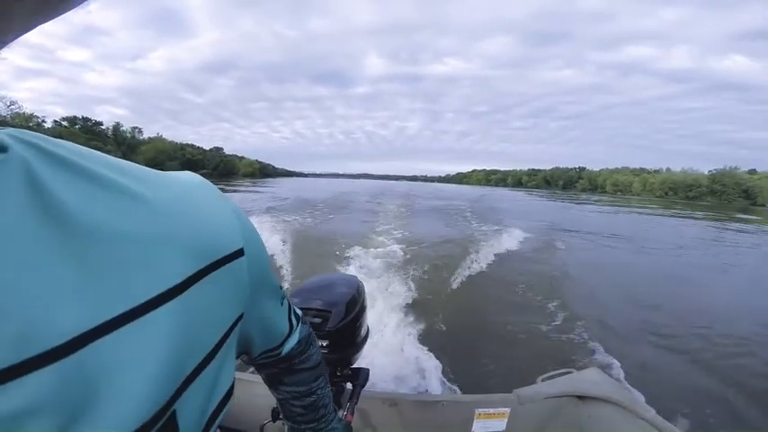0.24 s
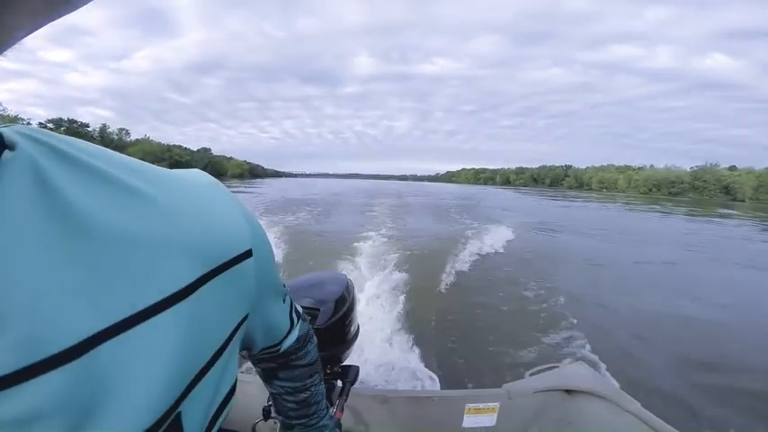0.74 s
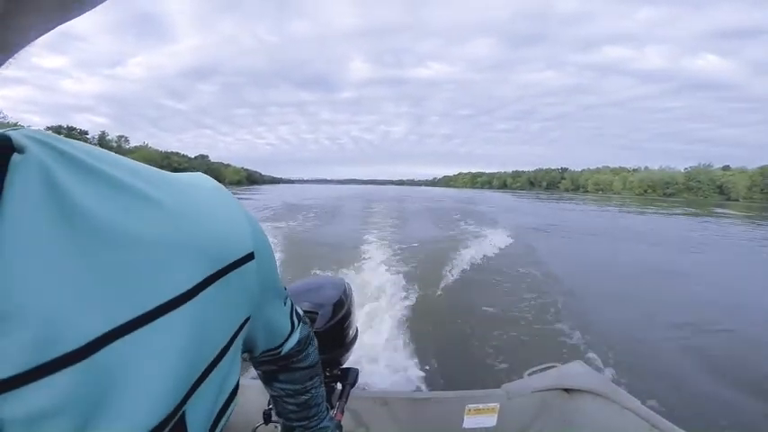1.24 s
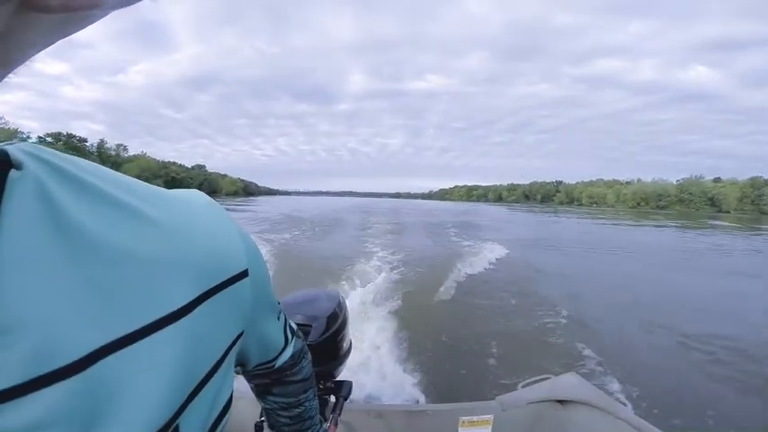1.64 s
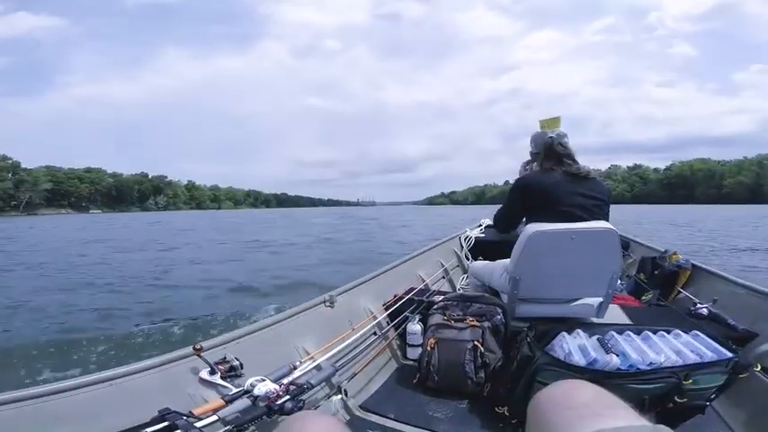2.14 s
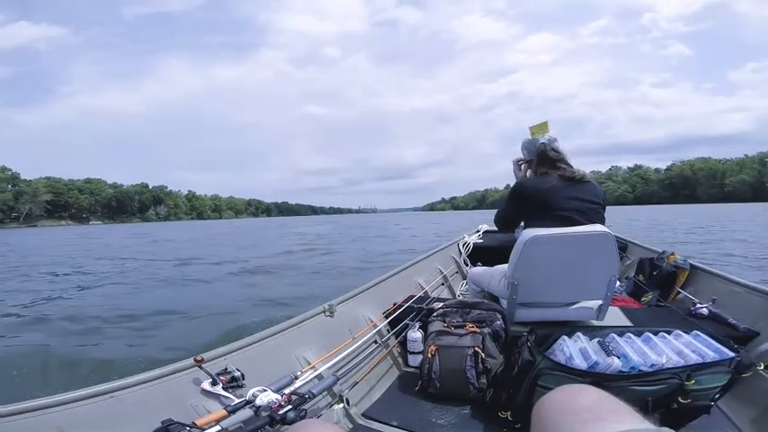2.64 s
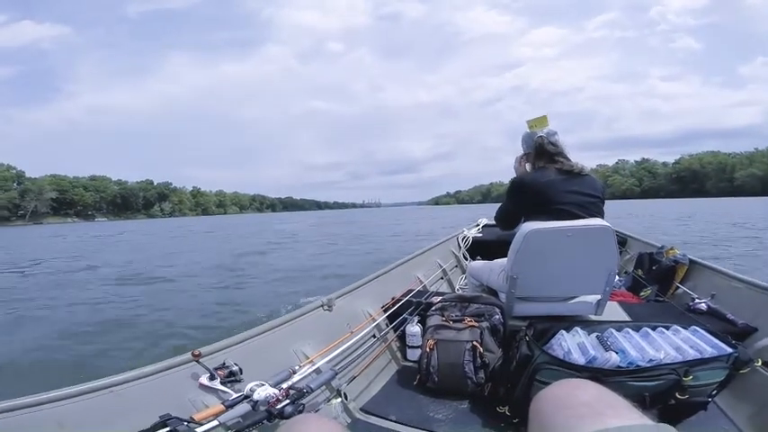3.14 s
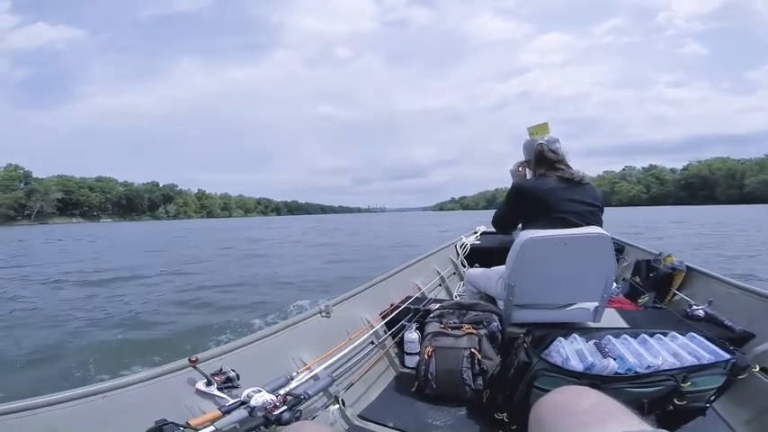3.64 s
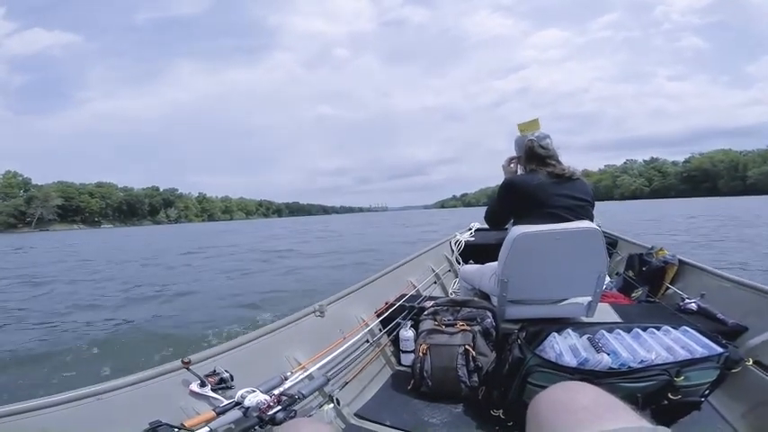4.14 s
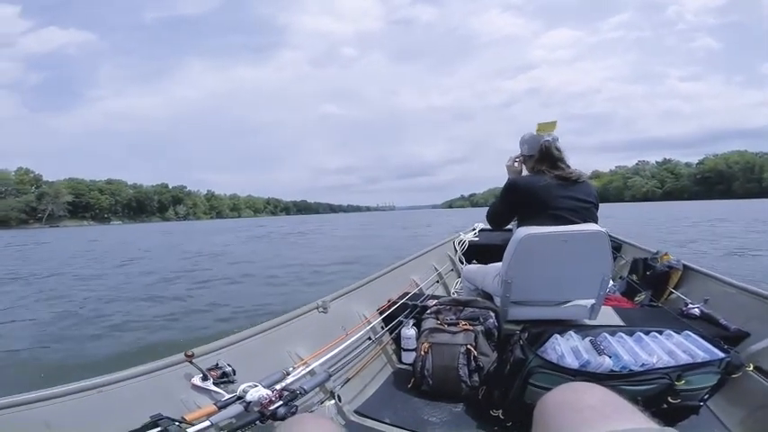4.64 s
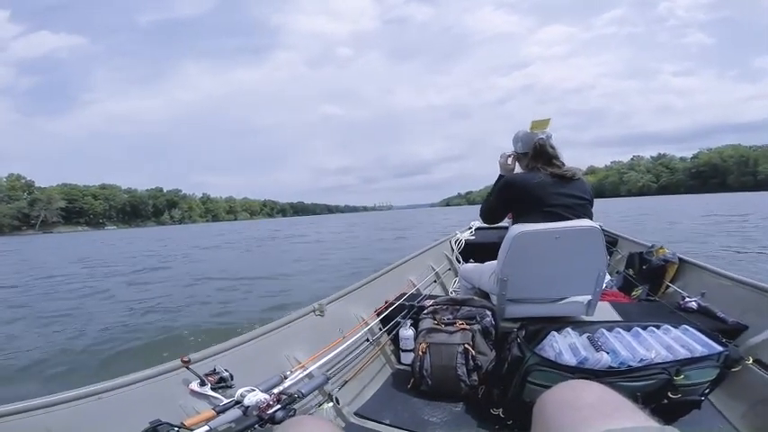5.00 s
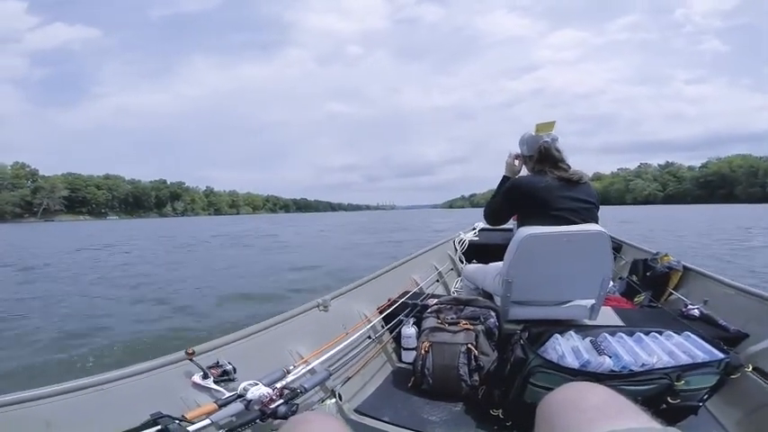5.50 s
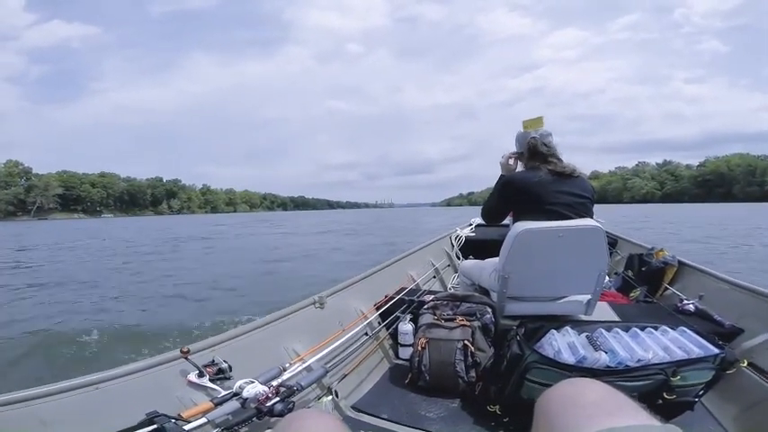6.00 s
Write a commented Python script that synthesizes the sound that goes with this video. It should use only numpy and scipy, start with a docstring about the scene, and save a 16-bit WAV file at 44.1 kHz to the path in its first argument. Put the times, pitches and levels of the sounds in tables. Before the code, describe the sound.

A steady, gritty boat motor with rushing water fills the first part, heard from right beside it. A faint knock and a stronger one come just before an abrupt cut. The motor then fades in lower in pitch, booming through the metal hull, with ticking clatter, low wind gusts, a thin panel whine and small splashes; in the last stretch its speed climbs.

```python
"""A small outboard motor pushes an open metal boat along a river: its firing pulses are a harmonic series of
crank orders, its valve gear a tick pattern periodic in the crank turn, the rushing water filtered noise.
First it is heard close by at the stern, where two bursts of decaying modes are knocks in the boat. The sound
breaks off, then fades back in from the middle of the boat, with a brief ringing tone, a singing cowling panel,
noise bursts of spray and light low-passed wind; hull resonances colour the orders as the motor speeds up."""
import sys
import numpy as np
from scipy import signal
from scipy.fft import rfft, irfft
from scipy.io import wavfile
from scipy.ndimage import map_coordinates

SR = 44100
rng = np.random.default_rng(int(sys.argv[2]) if len(sys.argv) > 2 else 0)


def put_to_file(sound):
    """Save the sound as 16-bit audio at rate SR, in the file named by the first command-line argument."""
    columns = np.atleast_2d(sound).T  # one column per channel
    safe = np.clip(columns, -1, 1)
    whole_steps = np.round(safe * 32767)
    wavfile.write(sys.argv[1], SR, whole_steps.astype(np.int16))


N = 276066
TIME = np.arange(N) / SR
BINS = np.fft.rfftfreq(N, 1 / SR)
RETURN_S = 1.801   # the midship sound opens


def from_db(db):
    """Amplitude gain as the exponential of a level: 20 dB per factor of ten."""
    return 10 ** (np.asarray(db) / 20)


def in_time(rows):
    """Linear interpolation of a curve (t/s, value) at every sample."""
    t, value = np.transpose(rows)
    return np.interp(TIME, t, value)


def at_hz(points, hz):
    """Spectral interpolation: level linear in log frequency."""
    f, db = np.transpose(points)
    return np.interp(np.log(np.maximum(hz, 1)), np.log(f), db)


def drift(rate):
    """Band-limited random fluctuation: spread about 1, with rate random knots a second."""
    knots = rng.standard_normal(2048)
    coarse = TIME[::64]
    smooth = map_coordinates(knots, [coarse * rate], order=3, mode="wrap")
    return np.interp(TIME, coarse, smooth)


def swells(rows, along=TIME):
    """Superposed Gaussian rises or dips in dB: rows of (centre, 1/e half width, level/dB)."""
    return sum(db * np.exp(-((along - centre) / half) ** 2) for centre, half, db in rows)


def settling(depth_db, time_s):
    """Exponential relaxation: a level that starts depth_db low at RETURN_S and eases up to 0 dB."""
    return -depth_db * np.exp(-np.maximum(TIME - RETURN_S, 0) / time_s)


def noise(spectrum):
    """Spectral shaping of white noise to rows of (f/Hz, level/dB per Hz)."""
    shaped = rfft(rng.standard_normal(N)) * from_db(at_hz(spectrum, BINS))
    return irfft(shaped, N) * np.sqrt(SR / 2)


def resonate(x, hz, width_hz):
    """Damped resonator: a pole pair whose radius sets the bandwidth, output scaled to rms 1."""
    r = np.exp(-np.pi * width_hz / SR)
    y = signal.lfilter([1, 0, -1], [1, -2 * r * np.cos(2 * np.pi * hz / SR), r * r], x)
    return y / y.std()


def crank(speed, unevenness):
    """Phase as integrated speed: turns of the crank, jittered since no two firings push quite alike."""
    return np.cumsum(speed) / SR + unevenness * drift(40)


def loaded(load, extra_speed):
    """Load dependence: the level of each layer is linear in the departure from cruise speed."""
    return {layer: from_db(db + slope_db * extra_speed) for layer, (db, slope_db) in load.items()}


def pulse_phases(gains, smear_turns, twin):
    """Minimum phase by Hilbert transform: the pulse starts sharply and rings out, high orders later."""
    log_gain = np.log(np.r_[gains[0], gains, gains[-2::-1]])
    order = np.arange(1, len(gains) + 1)
    minimum_phase = -np.imag(signal.hilbert(log_gain))[order]
    odd_lead = twin * (order % 2) * np.pi / 2   # at twin = 1 the two strokes of a turn are equally strong
    delay = np.pi * smear_turns * order ** 2 / len(gains)
    return odd_lead + minimum_phase - delay


def hum(turns, orders, shift, waver_db, smear_turns, twin):
    """Fourier series of the firing pulse: one wavering line per crank order."""
    share = np.clip(shift, 0, 1)
    _, first, last = np.transpose(orders)
    phases = pulse_phases(from_db(first) + from_db(last), smear_turns, twin)
    lines = []
    for k, phase in enumerate(phases):
        level = (1 - share) * first[k] + share * last[k]
        waver = waver_db * np.sqrt((k + 1) / len(orders)) * drift(21.99)   # high orders are less steady
        line = np.cos(2 * np.pi * (k + 1) * turns + phase)
        lines.append(np.sqrt(2) * from_db(level + waver) * line)
    return lines


def strikes(turns, decay_turns):
    """Periodic impulsive excitation: decaying valve gear contacts over the turn, rms 1."""
    # valve gear contacts in one turn: (place in the turn 0-1, relative level/dB)
    contact_rows = [(.1, -5), (0.418, -4.5), (0.602, -13), (0.718, -10.5), (0.929, -10.5)]
    envelope = sum(from_db(db) * np.exp(-((turns - place) % 1) / decay_turns) for place, db in contact_rows)
    return envelope / np.sqrt(np.mean(envelope ** 2))


def clatter(turns, spectrum, lowest, decay_turns, uneven_db, size=4096):
    """A periodic waveform has a line spectrum: the same short ticks each turn, wavering in strength."""
    place = np.arange(size) / size
    ticks = rfft(rng.standard_normal(size) * strikes(place, decay_turns))
    order = np.arange(len(ticks))
    hz = order * turns[-1] / TIME[-1]   # at the mean speed
    gain = from_db(at_hz(spectrum, hz)) * (order > lowest) / (1 + (hz / 5000) ** 6)
    phase_only = ticks / np.abs(ticks)   # the cowling sets the strength of each order
    one_turn = irfft(phase_only * gain) * size / np.sqrt(2)
    return np.interp(turns % 1, place, one_turn) * from_db(uneven_db * drift(90))


def wash(turns, spectrum, rings, throb, churn_db, fizz_db):
    """Turbulence as resonant noise: (low rush throbbing twice a turn with the firings, high hiss)."""
    rush = noise(spectrum)
    for hz, width_hz, db in rings:
        # two wider passes in a row
        once = resonate(rng.standard_normal(N), hz, width_hz * 1.2)
        rush = rush + from_db(db) * resonate(once, hz, width_hz * 1.2)
    rush = signal.sosfilt(signal.butter(2, 40, "high", fs=SR, output="sos"), rush)   # water has no deep bass
    low = irfft(rfft(rush) / (1 + (BINS / 2500) ** 4), N)
    pulsing = 1 + throb * np.cos(4 * np.pi * turns)
    return low * pulsing * from_db(churn_db * drift(35)), (rush - low) * from_db(fizz_db * drift(150))


def knocks():
    """Modal superposition: brief blunt contacts whose damped modes die within milliseconds."""
    # knocks in the boat: (t/s, level/dB, pitch factor)
    knock_rows = [(1.489, -16, 1.62), (1.7079, -1.5, 1.03)]
    # their modes: (f/Hz before the pitch factor, relative level/dB, t60/s)
    knock_modes = [(714, -3.5, 0.022), (1400, -3, 0.0087), (1750, -4, 0.0078), (2050, -3.5, 0.0082),
                   (3700, -14, 0.0062)]
    out = np.zeros(N)
    for s, db, pitch in knock_rows:
        age = np.maximum(TIME - s, 0)
        for k, (hz, mode_db, t60) in enumerate(knock_modes):
            decay_db = np.minimum(60 * age / t60, 200)
            mode = from_db(db + mode_db - decay_db) * np.sin(2 * np.pi * hz * pitch * age)
            out += (-1) ** k * mode
    return signal.sosfilt(signal.butter(4, 3600, fs=SR, output="sos"), out)


def stern():
    """Near-field superposition: right beside the motor and its wake; the motor eases off a little."""
    # crank speed: (t/s, speed/turns per s)
    speed_curve = [(0.0, 64.4), (0.502, 64.6), (0.91, 63.4), (1.134, 62.1), (1.72, 62.2)]
    # firing pulse: (crank order, level/dB rms at first speed, level/dB rms at last speed)
    hum_orders = [(1, -36.5, -34), (2, -21, -21), (3, -33.5, -25), (4, -20, -20.5), (5, -35.5, -37),
                  (6, -18, -36.5), (7, -38, -38), (8, -32.5, -29), (9, -38.5, -42), (10, -34.5, -27.5),
                  (11, -52, -36.5), (12, -35, -24), (13, -28, -31), (14, -29.5, -42), (15, -51, -38.5),
                  (16, -31, -29), (17, -32.5, -28.5), (18, -38.5, -38)]
    # valve gear before load: (f/Hz, level/dB rms per crank order)
    clatter_spectrum = [(1200, -42.5), (1310, -42), (1430, -47), (1560, -43.5), (1660, -34), (1800, -49),
                        (1970, -38), (2130, -62), (2355, -46), (2480, -63), (2600, -47.5), (2750, -64.5),
                        (3350, -71), (3800, -69.5)]
    # wake and exhaust bubbles before load: (f/Hz, level/dB per Hz)
    wash_spectrum = [(65, -60), (150, -48.5), (280, -59), (400, -54.5), (560, -55.5), (1050, -51.5),
                     (1450, -62), (1950, -61), (2800, -79.5), (3400, -73.5), (5400, -79.5), (8000, -87.5),
                     (11000, -96.5), (15000, -112.7)]
    # resonances that the rush excites, before load: (f/Hz, nominal width/Hz, level/dB rms)
    wash_rings = [(166.4, 29, -33), (1076, 55, -46), (1955, 80, -38), (3370, 230, -53), (5450, 160, -55.5),
                  (7830, 200, -64.5)]
    # layer: (level at cruise/dB, slope/dB per extra turn per s)
    load = {"clatter": (-4.5, -1.8), "water": (-1.1, -0.62), "hiss": (1.4, -.05)}
    cruise, shift_span = 64.6, -2.12   # turns per s; change that takes the hum to its last colour
    speed = in_time(speed_curve)
    extra_speed = speed - cruise
    gain = loaded(load, extra_speed)
    turns = crank(speed, unevenness=0.0004)
    motor = sum(hum(turns, hum_orders, extra_speed / shift_span, waver_db=2.0, smear_turns=0.549, twin=1))
    ticks = clatter(turns, clatter_spectrum, len(hum_orders), decay_turns=0.083, uneven_db=2.0)
    rush, hiss = wash(turns, wash_spectrum, wash_rings, throb=0.092, churn_db=-1.2, fizz_db=0.2)
    return motor + gain["clatter"] * ticks + gain["water"] * rush + gain["hiss"] * hiss + knocks()


def whine(level_db, hz, width_hz):
    """Noise-driven resonance: two cascaded resonators make a thin, noisy tone at the given level."""
    once = resonate(rng.standard_normal(N), hz, width_hz)
    return from_db(level_db) * resonate(once, hz, width_hz)


def opening_ring():
    """Exponential decay of a resonance: a tone that holds for a moment and dies away."""
    hold_s, t60_s = 0.047, 0.18
    age = np.maximum(TIME - RETURN_S - hold_s, 0)
    return whine(level_db=-38, hz=1033, width_hz=44) * np.exp(-np.log(1000) * age / t60_s)


def through_hull(lines, speed):
    """Order tracking through a fixed transfer function: hull resonances lift or lower each passing order."""
    # narrow peaks and a notch of the hull: (f/Hz, 1/e half width/Hz, level/dB)
    hull_peaks = [(236.3, 1.23, -8), (702, 6.2, 12.5), (813.4, 9.8, 5.5), (1031, 17, 5.5)]
    turns_per_s = np.linspace(speed.min(), speed.max(), 64)
    coloured = []
    for order, line in enumerate(lines, 1):
        hull_db = swells(hull_peaks, order * turns_per_s)
        coloured.append(line * from_db(np.interp(speed, turns_per_s, hull_db)))
    return coloured


def boom(line, extra_speed):
    """Structural resonance: the hull takes up the second order and lets go as the speed rises past it."""
    # the boom sinks for a moment: (t/s, 1/e half length/s, level/dB)
    boom_dips = [(4.25, 0.43, -4), (5.39, 0.069, -16)]
    level_db, edge, fall_db = -15, 2.44, 9   # rms; turns per s above cruise; dB lost per turn per s beyond
    db = level_db - fall_db * np.maximum(extra_speed - edge, 0) + swells(boom_dips)
    phase = np.angle(signal.hilbert(line))
    return from_db(db) * np.sqrt(2) * np.cos(phase)


def buzzing(ticks, extra_speed):
    """Speed-tuned resonance: the cowling lifts one band of clatter near one speed and lowers it elsewhere."""
    # edges of the buzzing band: (lower f/Hz, upper f/Hz)
    buzz_band = (1600, 1850)
    resonant_at, peak_db, fall_db = 1.35, 4, 3.5   # turns per s above cruise; dB there; dB per turn per s away
    band = signal.sosfiltfilt(signal.butter(2, buzz_band, "band", fs=SR, output="sos"), ticks)
    band_gain = from_db(peak_db - fall_db * np.abs(extra_speed - resonant_at))
    return ticks + (band_gain - 1) * band


def panel(turns):
    """Forced vibration: valve gear contacts drive a resonant cowling panel that builds up slowly."""
    level_db = -47 + settling(depth_db=15.5, time_s=1.3)
    return whine(level_db, hz=3504, width_hz=79) * strikes(turns, decay_turns=0.33)


def tappet(turns, speed, uneven_db):
    """Impulse response of damped modes: one tappet rings the cowling each turn, never equally strongly."""
    # before load and unevenness: (f/Hz, level/dB rms, decay/s)
    tappet_modes = [(2307, -47, 0.0012), (3484, -54, 0.0037)]
    age = (turns - 0.42) % 1 / speed   # s since the strike at this place in the turn
    out = 0
    for hz, db, decay_s in tappet_modes:
        ring = np.exp(-age / decay_s) * np.sin(2 * np.pi * hz * age)
        out = out + from_db(db) * ring / ring.std()
    return out * from_db(uneven_db * drift(60))


def wind():
    """Low-frequency turbulence at the microphone: shaped noise swelling with the gusts."""
    # shape of the spectrum: (f/Hz, relative level/dB per Hz)
    wind_spectrum = [(10, -28), (25, -6), (45, -18), (80, -12.5), (150, -13.5), (400, -69.5)]
    # gusts and a lull: (t/s, 1/e half length/s, level/dB)
    gust_rows = [(2.25, 0.77, 10), (3.7, 0.54, 8), (5.2, 0.23, -2)]
    gain_db = -42.5 + swells(gust_rows) + 1.5 * drift(23)
    return noise(wind_spectrum) * from_db(gain_db)


def splashes(decay_s):
    """Transient broadband noise: spray slaps the bow in short, exponentially decaying bursts."""
    # slaps: (t/s, gain/dB)
    splash_rows = [(3.066, -47), (3.658, -42), (3.84, -36), (4.03, -35), (4.77, -38), (5.683, -42)]
    # shape of the spray spectrum: (f/Hz, relative level/dB per Hz)
    spray_spectrum = [(800, -42), (2800, -33), (5000, -42), (8000, -44), (11000, -60), (14000, -94)]
    bursts = sum(from_db(db) * (TIME > s) * np.exp(-np.abs(TIME - s) / decay_s) for s, db in splash_rows)
    return bursts * noise(spray_spectrum)


def midship():
    """Source and structure combined: further forward the hull booms, the water is softer and wind blows."""
    # crank speed: (t/s, speed/turns per s)
    speed_curve = [(1.84, 55.9), (2.54, 55.5), (2.64, 55.9), (4.75, 55.7), (5.01, 57.1), (5.5, 58.3),
                   (5.94, 60.0), (6.25, 60.2)]
    # firing pulse before hull and load: (crank order, level/dB rms at first speed, level/dB rms at last speed)
    hum_orders = [(1, -33, -29.5), (2, -22, -30.5), (3, -17.5, -19), (4, -19, -18), (5, -33.5, -27.5),
                  (6, -34, -22), (7, -40, -24), (8, -24.5, -21), (9, -49, -42.5), (10, -36.5, -22.5),
                  (11, -42.5, -35), (12, -40, -33.5), (13, -29, -35), (14, -39.5, -27.5), (15, -28, -40),
                  (16, -57, -39.5), (17, -68, -33), (18, -34, -27), (19, -36, -41), (20, -50, -50.5),
                  (21, -39, -41.5), (22, -46.5, -50), (23, -38, -41), (24, -49, -51)]
    # valve gear before buzz and load: (f/Hz, level/dB rms per crank order)
    clatter_spectrum = [(1400, -46), (1510, -43), (1580, -47), (1690, -41), (1860, -62), (1955, -40),
                        (2030, -78), (2200, -63.5), (2290, -47), (2380, -57), (2620, -55.5), (3100, -61.5),
                        (3480, -58), (3950, -67), (5000, -73)]
    # wake and exhaust bubbles before load: (f/Hz, level/dB per Hz)
    wash_spectrum = [(60, -54.5), (150, -48.5), (300, -56.5), (1000, -56.5), (1400, -71), (2500, -74.5),
                     (3100, -80.5), (3500, -79.5), (4000, -86), (5300, -81.5), (7000, -88.5), (8500, -90),
                     (11500, -102), (14500, -118)]
    # resonances that the rush excites, before load: (f/Hz, nominal width/Hz, level/dB rms)
    wash_rings = [(1075, 260, -43), (4490, 190, -60.5), (5250, 160, -57.5), (7700, 300, -60.5),
                  (8100, 400, -60)]
    # layer: (level at cruise/dB, slope/dB per extra turn per s)
    load = {"hum": (0.98, -1.44), "clatter": (1.14, -0.78), "water": (1.44, 0.14), "hiss": (3.94, .3)}
    cruise, shift_span = 55.8, 3.23   # turns per s; change that takes the hum to its last colour
    speed = in_time(speed_curve)
    extra_speed = speed - cruise
    gain = loaded(load, extra_speed)
    turns = crank(speed, unevenness=0.00014)
    lines = hum(turns, hum_orders, extra_speed / shift_span, waver_db=1.5, smear_turns=0.296, twin=0)
    first, second, *higher = through_hull(lines, speed)
    ticks = clatter(turns, clatter_spectrum, len(hum_orders), decay_turns=0.078, uneven_db=-0.6)
    rush, hiss = wash(turns, wash_spectrum, wash_rings, throb=0.068, churn_db=-0.3, fizz_db=0.63)
    hiss = hiss * (0.38 + 0.3 * strikes(turns, decay_turns=0.41))   # each contact adds a puff of treble
    motor = gain["hum"] * (first + sum(higher)) + boom(second, extra_speed)
    motor += gain["clatter"] * (buzzing(ticks, extra_speed) + tappet(turns, speed, uneven_db=1.0))
    motor += panel(turns)
    water = gain["water"] * rush + gain["hiss"] * hiss + splashes(decay_s=0.0074)
    return motor + water + wind()


def scene():
    """Amplitude gating: the stern stops dead; after a short silence the midship sound opens and fades up."""
    break_s, break_fall_s, return_rise_s = 1.7315, 0.00084, 0.026
    before = np.clip((break_s - TIME) / break_fall_s, 0, 1)
    after = np.clip((TIME - RETURN_S) / return_rise_s, 0, 1) ** 2
    fade = from_db(settling(depth_db=18.5, time_s=0.81))
    return (before * stern() + after * (fade * midship() + opening_ring()))[None]


def record(dry):
    """Soft saturation and low-pass filtering: the highest peaks are rounded and the top is cut."""
    held = dry / (1 + (dry / .95) ** 8) ** (1 / 8)
    cutoff_hz, ripple_db = 14800, 0.1
    return signal.sosfilt(signal.cheby1(12, ripple_db, cutoff_hz, fs=SR, output="sos"), held)


dry = scene()
out = record(dry)
put_to_file(out)
```